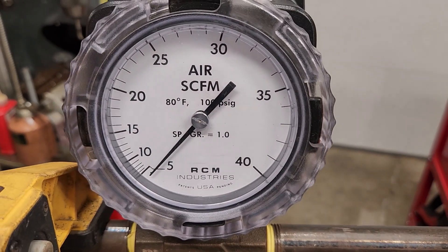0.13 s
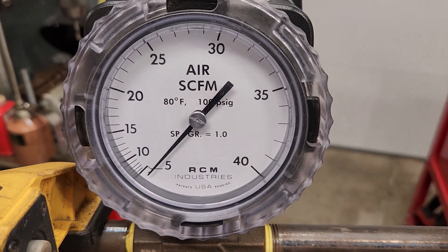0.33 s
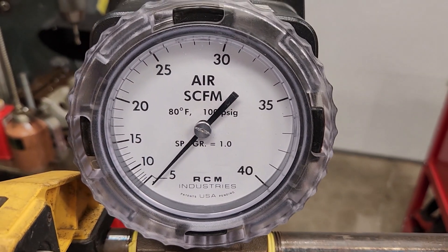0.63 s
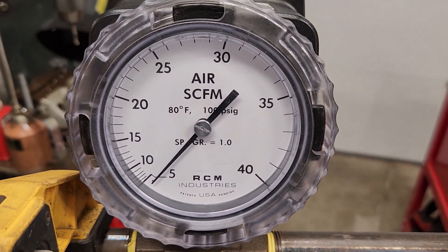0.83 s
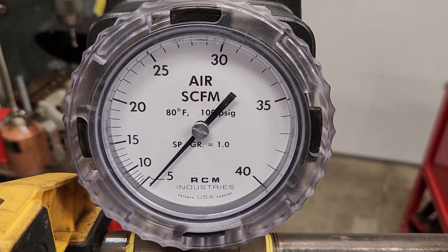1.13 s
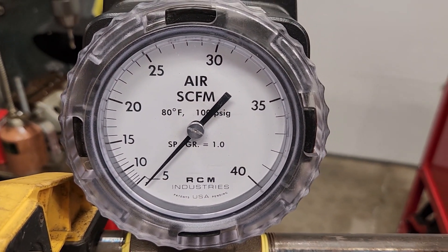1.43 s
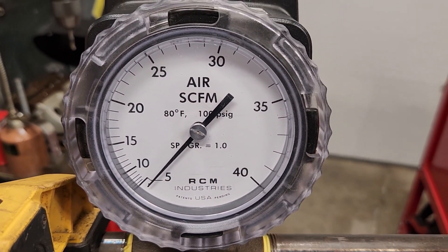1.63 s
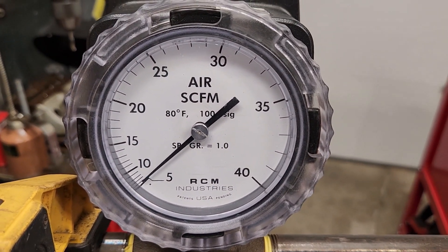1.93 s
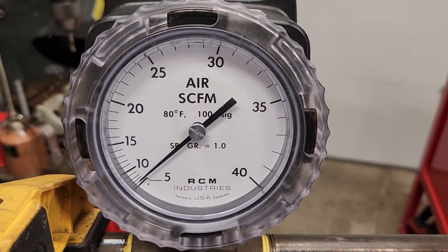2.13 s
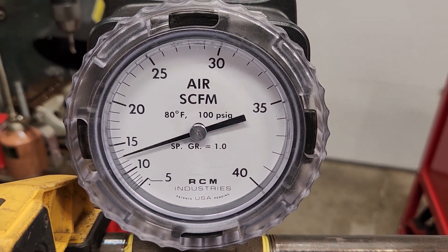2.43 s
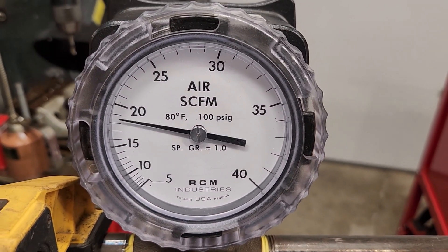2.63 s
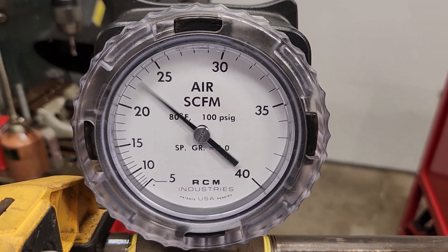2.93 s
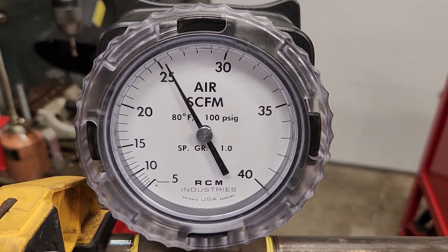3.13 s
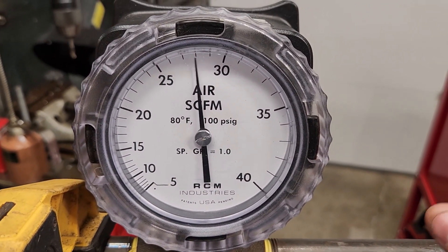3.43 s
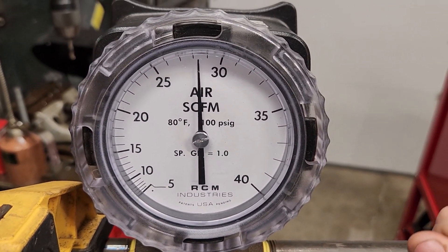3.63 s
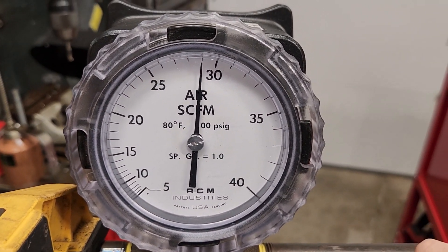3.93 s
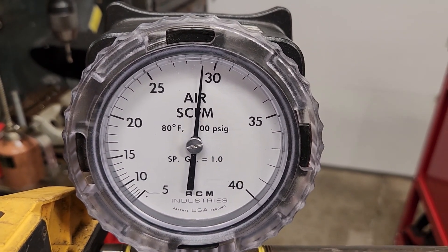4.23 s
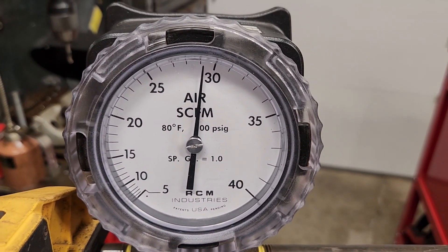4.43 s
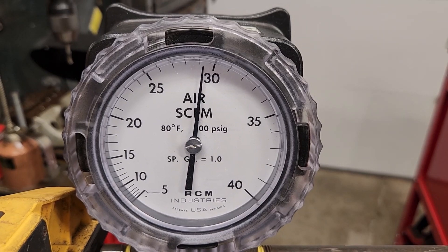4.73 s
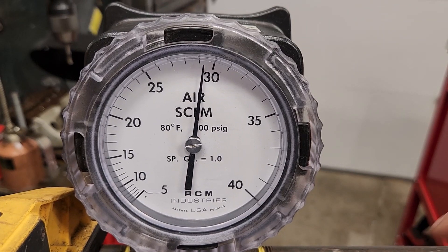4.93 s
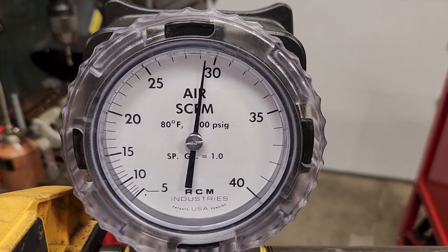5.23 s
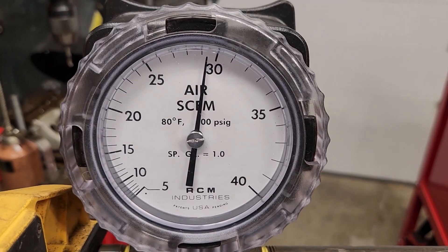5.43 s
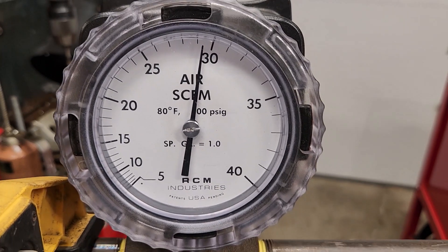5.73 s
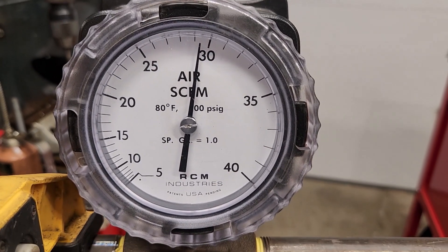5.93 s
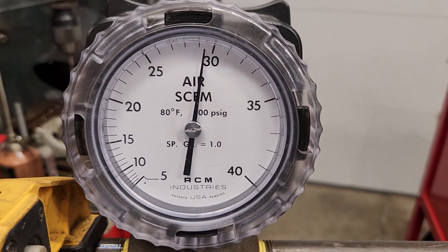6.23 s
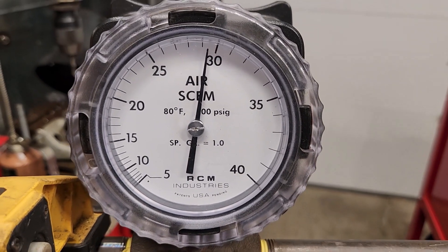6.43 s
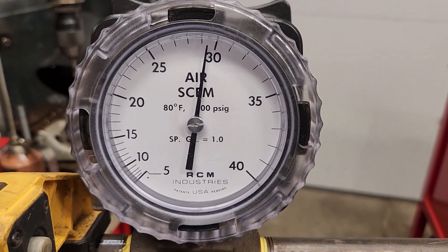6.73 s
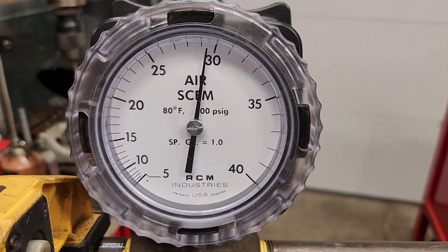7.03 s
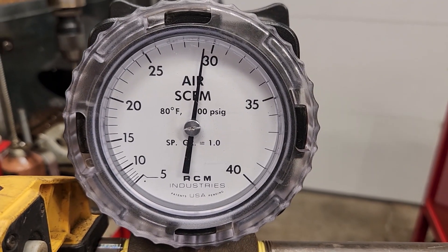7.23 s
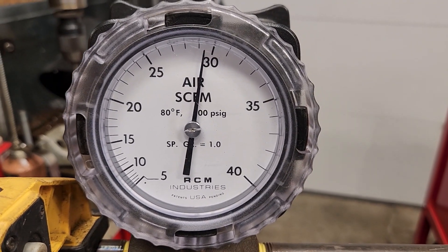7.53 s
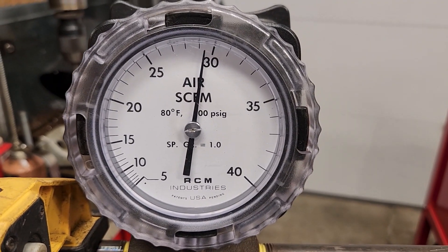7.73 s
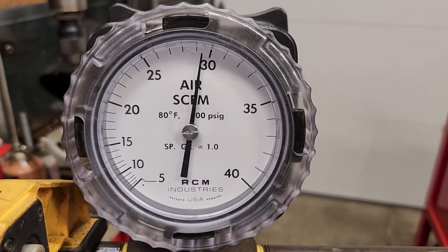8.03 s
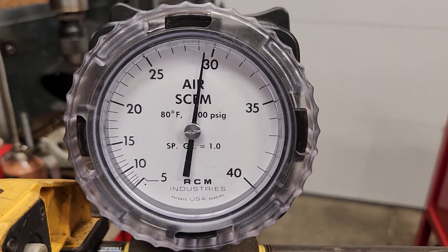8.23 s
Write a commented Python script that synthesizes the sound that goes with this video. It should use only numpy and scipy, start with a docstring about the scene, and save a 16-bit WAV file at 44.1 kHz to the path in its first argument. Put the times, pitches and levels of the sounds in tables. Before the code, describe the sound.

For the first 1.2 seconds there is only low ventilation rumble and machine hum in a workshop, with barely audible brushes of a hand near 0.1, 0.3 and 0.9 s. At about 1.25 s a valve unseats with tiny pops and a sudden bright, close hiss, overshooting then settling, with a narrow ring around 4 kHz. A second nudge at 1.8 s lifts it slightly. From 2.2 s low gusts flutter on the microphone, strongest near 2.6 s. Between 3.1 and 3.9 s the jet catches brief notes, sags in pitch and dies, as hose and coupler fill with a broad, ringing rush. From 4 s this strengthens into a steady, harsh, high-mid roar with airy spray, small irregular throbs and faint low puffs. A thin whistle near 11.5 kHz sits left, shifting rightward after about 5.5 s, when the tone sharpens slightly. The flow continues through the end at 8.3 s.

```python
"""Workshop: a valve on a compressed-air line is opened slowly, close to a two-port microphone.
The narrow gap first makes a bright jet of filtered noise, whose draught buffets the ports; it sinks and dies.
Then the full flow rings hose and coupler as noise bands, throbbing a little over a broad rush and spray.
A thin sine whistles from an edge; low ventilation rumble and hum lie behind, softer once the air is on."""
import sys
import numpy as np
from scipy import signal
from scipy.fft import rfft, irfft, next_fast_len
from scipy.io import wavfile
from scipy.ndimage import uniform_filter1d

SR = 44100
rng = np.random.default_rng(int(sys.argv[2]) if len(sys.argv) > 2 else 0)


def master_out(mix):
    """Clip the mix to full scale and print it as 16-bit PCM to the path in sys.argv[1]."""
    frames = np.transpose(np.atleast_2d(mix))
    ceiling = np.clip(frames, -1, 1)
    pcm = np.round(ceiling * 32767).astype(np.int16)
    wavfile.write(sys.argv[1], SR, pcm)


N = 369116
SIZE = next_fast_len(N + 4096, True)
HZ, TIME = np.fft.rfftfreq(SIZE, 1 / SR), np.arange(N) / SR
PORT_LAG_S = 0.000416  # the left port is further from the air line
PORT_PHASE = -2 * np.pi * HZ * PORT_LAG_S  # phase by which left leads (rad)

# the valve opens in nudges, each of which overshoots, then settles: (time [s], rise [s], lasting step [dB],
# overshoot of the roar [dB], overshoot of the fizz [dB], settling time [s])
NUDGES = [(1.24, 0.034, 28, 6, 2.5, 0.066), (1.81, 0.051, 2, 0.5, 2, 0.046)]


def valve_jet(walls):
    """The roar slides down as the jet slows; shock cells fizz only while the gap is narrow."""
    # mixing roar of the jet: (frequency [Hz], left [dB], right [dB]), relative
    roar_spectrum = [(60, -53, -19), (664, -15, -10.5), (1160, -7.5, -12), (1500, -0.5, -3.5),
                     (1950, -0.5, -6), (2894, -0.5, 0.5), (3800, 1.5, 4.5), (4180, -1, 0), (5720, -4.5, -4),
                     (6310, -10.5, -10), (7400, -16, -41), (11100, -10.5, -8.5), (16100, -36.5, -35)]
    # shock fizz of the jet: (frequency [Hz], left [dB], right [dB]), relative
    fizz_spectrum = [(3000, -31, -44), (5800, -3, -8), (7200, 1, -1.5), (8500, -1, -5), (10220, -0.5, -6),
                     (10900, -5, -17), (11900, 0, -6.5), (13700, -0.5, -3.5), (14620, 5, -8),
                     (15970, -0.5, -9)]
    # peaks and dips of the valve body: (frequency [Hz], width [Hz], left [dB], right [dB])
    valve_body = [(2130, 350, 5, 4), (2950, 130, 6.5, -1), (3820, 140, 0, 2), (4130, 240, 6, 7),
                  (4500, 240, 2.5, 5.5), (4820, 200, 6, 7), (5080, 120, -3, -1), (5380, 470, 8, 8),
                  (5880, 144, 5.5, -3), (5950, 120, 1.5, -10), (6850, 158, -6, -12.5), (6930, 277, 1, 5),
                  (9350, 550, -1, -12.5)]
    # slowing and sideways swing of the jet: (time [s], speed [factor on pitch], left minus right [dB])
    jet_path = [(1.3, 1.006, -1.5), (1.8, 0.98, -0.5), (2.5, 0.93, 0), (3.15, 0.95, 2), (3.33, 0.99, 2),
                (3.45, 0.74, 6.5), (3.6, 0.49, 7), (3.9, 0.23, -1)]
    gone_s = 3.89  # the valve is wide open

    roar_db, fizz_db = jet_levels()
    _, left_db = curves(jet_path)
    body = bumps(valve_body)

    # the roar's spectrum shrinks in frequency with the speed
    source = turbulence(body, PORT_PHASE, walls, loose_db=-1.0)
    hz, s, z = signal.stft(source, SR, nperseg=512)
    speed = np.interp(s, *np.transpose(jet_path)[:2])
    z = z * colour(roar_spectrum, hz[:, None] / speed) / np.sqrt(speed)
    roar = evened(signal.istft(z, SR, nperseg=512)[1][:, :N])
    roar = roar * amp(roar_db + np.outer([.5, -.5], left_db) - 0.17)

    fizz = turbulence(colour(fizz_spectrum) * body, PORT_PHASE, amp(3.0) * walls, loose_db=20.0)
    fizz = fizz * amp(fizz_db + 3.5)
    return (roar + fizz) * fade(1.243, 1.263) * fade(gone_s, 3.42) * amp(0.5 * wander(30))


def jet_levels():
    """Levels of roar and fizz in dB: each nudge of the valve lifts both, with an overshoot that dies away."""
    # the jet apart from the nudges: (time [s], roar [dB], shock fizz [dB]), before the trims in valve_jet
    levels = np.array(curves([(1.6, -19.5, -22.5), (2.03, -18.5, -22), (2.3, -19.5, -20.5),
                              (2.63, -21, -19.5), (3.04, -21.5, -22.5), (3.2, -22, -23.5),
                              (3.33, -22.5, -28.5), (3.56, -27.5, -50), (3.7, -25.5, -41.5)]))
    hold_s = 0.024  # an overshoot holds this long before it settles
    for s, rise, step_db, roar_db, fizz_db, settle in NUDGES:
        opened = fade(s, s + rise)
        overshoot = opened * np.exp(-np.maximum(TIME - s - rise - hold_s, 0) / settle)
        levels = levels + step_db * (opened - 1) + np.outer([roar_db, fizz_db], overshoot)
    return levels


def chamber(jet):
    """The colour of the valve's chamber takes over as the gap widens."""
    # peaks and dips of the chamber: (frequency [Hz], width [Hz], left [dB], right [dB])
    cavity = [(2050, 370, 3.5, 2.5), (2480, 310, -1, 3), (3420, 840, -3, -5), (4820, 130, 6, -6)]
    return jet + (filtered(jet, bumps(cavity)) - jet) * fade(2.85, 3.2)


def valve_pops():
    """As the valve unseats, each pop is a brief push of air and its rebound."""
    # pressure pops: (time [s], approximate peak [dB], time scale [s])
    pops = [(1.265, -32.5, 0.00034), (1.276, -28.5, 0.00061)]
    out = np.zeros(N)
    for s, db, length in pops:
        u = np.maximum(TIME - s, 0) / length
        out += amp(db) * 2 * u * (2 - u) * np.exp(-u)
    return out


def gap_ring(walls):
    """The first burst rings the narrow gap, which sings on more softly until the valve is nudged wider."""
    # ring of the barely open gap: (frequency [Hz], width [Hz], left [dB], right [dB], left's phase lead [rad]),
    # before the burst's level
    gap_mode = (4190, 140, -18.5, -16.5, 0.8)
    opens, rise = NUDGES[0][:2]
    settle_s = .06
    burst = np.exp(-np.maximum(TIME - opens - 0.07, 0) / settle_s)
    level_db = -7 * (1.5 - burst)  # sinks by 7 dB after the burst
    starts = fade(opens + rise / 2, opens + 2 * rise)
    ends = fade(1.9, NUDGES[1][0])
    return ring(gap_mode, walls) * amp(level_db) * starts * ends


def jet_notes(walls):
    """As the jet slows it catches one resonance of the valve after another, and the pitch finally sags."""
    # brief notes of the dying jet: (time [s], length [s], frequency [Hz], width [Hz], left [dB], right [dB],
    # left's phase lead [rad])
    notes = [(3.14, .14, 2170, 130, -31, -35, -0.53), (3.34, 0.12, 2825, 110, -26, -29, -.4),
             (3.57, 0.21, 2160, 160, -33, -37, -.6)]
    sag_from_s, sag_per_s = 3.45, .45  # share of the pitch lost each second
    pitch = np.clip(1 - sag_per_s * (TIME - sag_from_s), .5, 1)
    return sum(swell(s, length) * glide(ring(mode, walls), pitch) for s, length, *mode in notes)


def pipe_flow(walls):
    """The flow rings hose and coupler over a broad rush; the coupler throbs most, the hose follows gently."""
    # the hose fills and its modes settle: (time [s], drive [dB], pitch [factor])
    hose_drive = [(2.7, -9, 0.992), (3.05, -3, 0.85), (3.45, -3.5, 1.079), (3.7, -1, 0.96),
                  (4.0, -0.5, 0.9944), (4.6, 2, 1.0), (5.5, 3, 1), (8.3, 4, 0.99)]
    # modes of the hose: (frequency [Hz], width [Hz], left [dB], right [dB], left's phase lead [rad]), before drive
    hose_modes = [(356, 107, -45.5, -44, -0.2), (650, 220, -45, -43.5, -1), (1000, 217, -35, -37.5, -0.9),
                  (1894, 123, -31.5, -39, 3), (1990, 382, -32, -38, 2), (2732, 150, -33.5, -33, 1.7)]
    # modes of the coupler: (frequency [Hz], width [Hz], left [dB], right [dB], left's phase lead [rad],
    # step at the flip [dB]), before the flow's level
    coupler_modes = [(3495, 260, -34, -28.5, 4.5, -2), (4140, 300, -31.5, -26.5, 1, -5),
                     (4770, 130, -26, -27.5, 0.56, 1.5), (5520, 380, -23.5, -25, 4.5, -1),
                     (6371, 170, -26.5, -31.5, 2, 2.5), (6680, 200, -27, -30, 1.3, 4),
                     (7030, 240, -28.5, -26.5, 1.3, 2.5), (7290, 255, -29, -35, 1.7, 0),
                     (7724, 320, -29.5, -24, 0.94, 3), (8430, 230, -32, -37, -1.55, 1.5)]
    # rush in the line: (frequency [Hz], left [dB], right [dB]), relative
    rush_spectrum = [(60, -44, -34), (170, -19, -42), (306, -10, -10), (734, -14, -9), (1313, 0, -3.5),
                     (1630, -4, -4), (2510, 4.5, -5.5), (3180, 5.5, 7), (4300, 4, 4), (6000, 6.5, 4),
                     (7600, 1, -23), (9000, -14, -20), (16000, -35.5, -30)]
    # outlet spray: (frequency [Hz], left [dB], right [dB]), relative
    spray_spectrum = [(5002, -33, -34), (7948, 0, -3), (9330, 4, -5), (10350, 4, 2), (10930, 6.5, 6),
                      (11800, 6, 5), (11800, -0.5, -0.5), (13500, 5.5, 1), (14600, 3, -6),
                      (15200, 5.5, -11), (15900, -1.5, -10)]
    # peaks and dips of the line: (frequency [Hz], width [Hz], left [dB], right [dB])
    hollows = [(468, 29, -4, -14), (1210, 100, 3.5, -5), (1610, 61, 0, 2.5), (2475, 120, -10, 5.5),
               (3170, 200, -1.5, -2), (5040, 71, 3, 0), (6740, 100, -4.5, 3), (7200, 127, -7, 1),
               (8160, 140, -11, -8)]
    onset_s = 2.2  # air begins to rush in the line

    fill_db, throb_db = flow_strength()
    flow_db = fill_db + throb_db

    drive_db, pitch = curves(hose_drive)
    hose = glide(sum(ring(mode, walls) for mode in hose_modes), pitch)
    hose = hose * fade(2.86, 2.91) * amp(drive_db + 0.16 * throb_db)

    coupler = sum(ring(mode, walls) * amp(flow_db + step_db * flipped()) for *mode, step_db in coupler_modes)

    rush = turbulence(colour(rush_spectrum), PORT_PHASE, amp(-3.0) * walls, loose_db=-4)
    rush = rush * amp(-24.5 + 0.63 * flow_db)

    spray = turbulence(colour(spray_spectrum), PORT_PHASE, amp(2) * walls, loose_db=0.0)
    spray = spray * amp(-25 + 0.72 * flow_db - 7.2 * fade(3.88, 3.62))  # softer at first

    flutter = wander(31.0)  # the jet flaps at the outlet
    pipe = (hose + fade(onset_s, 4.26) * (coupler + rush)) * amp(0.39 * flutter)
    return filtered(pipe + fade(3.4, 3.46) * spray * amp(.5 * flutter), bumps(hollows))


def flow_strength():
    """The slow build-up of the flow towards full strength and its throbbing, both in dB."""
    # surges and falters of the flow: (time [s], length [s], change [dB])
    throbs = [(3.87, 0.17, 1.5), (4.074, 0.067, -0.5), (4.21, 0.033, -5), (4.248, 0.18, 1.5),
              (4.339, 0.035, -2), (4.538, 0.046, -3), (4.724, 0.095, -2), (4.804, 0.16, 1.5),
              (4.961, 0.12, -1.5), (5.155, 0.12, -1), (5.29, 0.084, 1), (5.365, 0.064, -2),
              (5.56, .18, -0.2), (5.69, .08, -2), (5.775, .08, 1), (5.87, .09, -2.5), (5.947, 0.053, -0.8),
              (6.023, 0.056, -2.2), (6.354, 0.062, 0.5), (6.553, 0.047, -3.5), (6.693, 0.11, -0.5),
              (6.786, 0.053, -3), (6.97, 0.24, -2), (7.154, 0.09, 2), (7.28, 0.2, -2), (7.417, 0.036, 1.5),
              (7.497, 0.031, 1.5), (7.758, 0.048, -1.5), (8.016, 0.14, 1.4), (8.17, 0.15, -3.5)]
    fill_start_s, fill_s = 3.35, 0.95  # start, time constant
    empty_db, filled_db = -8, 1.23
    fill_db = filled_db + (empty_db - filled_db) * np.exp(-np.maximum(TIME - fill_start_s, 0) / fill_s)
    throb_db = 0.72 * wander(10) + sum(db * swell(s, length) for s, length, db in throbs)
    return fill_db, throb_db


def flipped():
    """Goes from 0 to 1 as the flow in the coupler flips to a sharper state."""
    flip_at_s, flip_s = 5.4, 0.041
    return fade(flip_at_s, flip_at_s + flip_s)


def whistle():
    """Vortices shed from an edge in the coupler: a thin tone that wavers a little in pitch and strength."""
    # the whistle locks in on the left, then spreads to both ports: (time [s], left [dB], right [dB])
    whistle_levels = [(2.85, -48, -55), (3.15, -34, -44), (3.68, -31, -57), (3.8, -25, -47),
                      (4.15, -28.5, -50), (5.0, -23.5, -53), (5.5, -24.5, -37), (5.85, -31.5, -28),
                      (6.3, -32.5, -27.5), (8.3, -34, -27.5)]
    whistle_hz, flicker_db = 11463, 3.6
    phase = 2 * np.pi * np.cumsum(whistle_hz + 8 * wander(46)) / SR
    ports = []
    for side_db, lead in zip(curves(whistle_levels), [1.0, 0]):
        flickering = amp(side_db + flicker_db * wander(12))  # each port flickers by itself
        ports.append(flickering * np.sin(phase + lead))
    return np.sqrt(2) * np.array(ports) * fade(2.8, 2.9)


def draught():
    """Eddies hit the ports in lumps, the left one harder; small, brighter eddies grow with a strong draught."""
    # spectrum of the buffeting: (frequency [Hz], density [dB per Hz]), relative
    buffet = colour([(12, -35), (20, -14), (70, 4), (130, -2.5), (243, -4.5), (358, -4.5), (430, -8),
                     (688, -5), (1100, -12), (1430, -18.5), (2420, -120)])
    level_db = draught_level()
    large = turbulence(buffet / (1 + (HZ / 150) ** 2), phase=0, walls=0, loose_db=-9.5)
    large = large * amp(2.2 * wander(13) - 7.5)
    small = turbulence(buffet * HZ / (HZ + 150), phase=0, walls=0, loose_db=2)
    small = small * amp(0.21 * (level_db + 35.0) - 0.14 + 0.49 * wander(26))
    return (large + small) * amp(level_db + np.array([[2.5], [-2.5]])) * fade(1.255, 1.275)


def draught_level():
    """Level in dB of the jet's passing sweep, the single gusts and a light draught that comes and goes."""
    # single gusts on the microphone: (time [s], length [s], level [dB]), before the split between the ports
    gust_list = [(1.283, 0.04, -50), (1.41, 0.098, -51), (1.59, 0.3, -58), (1.915, 0.061, -47),
                 (2.216, 0.08, -38.5), (2.426, 0.073, -42), (2.635, 0.049, -39), (2.797, 0.089, -43),
                 (3, 0.036, -43), (4.821, 0.05, -57), (5.28, 0.053, -53), (5.494, 0.074, -46),
                 (5.703, 0.043, -45), (5.906, 0.079, -45), (6.118, 0.057, -42), (6.3, .06, -49),
                 (6.58, .04, -54), (6.684, 0.053, -48), (7.138, 0.042, -51), (7.407, .05, -50),
                 (7.64, 0.052, -50), (7.803, 0.072, -48)]
    sweep_at_s, sweep_db = 2.624, -26.5  # peak of the sweep over the microphone
    rise, fall = 20.3, 31  # dB per s
    calm_db, stirred_db, lumps_db = -50.5, -47.5, 3  # light draught before and after the flip, its swing

    sweep = amp(sweep_db - np.maximum(rise * (sweep_at_s - TIME), fall * (TIME - sweep_at_s)))
    gusts = sum(amp(db) * swell(s, length) for s, length, db in gust_list)
    lumps = lumps_db * np.tanh(2 * wander(8.8))
    light = amp(calm_db + (stirred_db - calm_db) * flipped() + lumps)
    return 20 * np.log10(sweep + gusts + light)


def hollowed(air):
    """Valleys slide down and deepen in patches; the right port's middle is shaded and the bass has lulls."""
    # valleys between the modes: (frequency [Hz], width [Hz], depth before the patches [dB], opens at [s],
    # opening time [s])
    valleys = [(593, 256, -5, 1.28, 0.033), (1430, 255, -12.5, 4, 1.1), (2550, 134, -10, 3.4, 0.25),
               (3285, 290, -9.5, 3.4, 0.11), (5010, 77, -5, 3.6, 2.0)]
    # middle range of the right port: (time [s], level [dB])
    shade = [(3.4, -3), (3.9, -8), (4.9, -8), (5.3, -5), (5.55, 1.5)]
    # brief losses of bass: (time [s], length [s], depth [dB])
    lulls = [(1.35, 0.057, 10), (1.68, 0.045, 13), (2.967, .06, 3), (3.328, 0.072, 9), (3.436, 0.045, 13),
             (3.58, 0.066, 17), (3.826, .04, 11), (4.353, 0.072, 19), (4.58, 0.07, 19), (4.7, 0.078, 15),
             (5.011, 0.085, 22), (5.177, 0.055, 12), (5.412, 0.068, 27), (5.76, 0.037, 10),
             (6.03, 0.055, 21), (6.183, .045, 20), (6.505, .07, 21), (7.22, .05, 13), (7.32, 0.05, 10),
             (7.52, 0.077, 8), (8.03, 0.059, 16)]
    patch_hz, patch_s, uneven = 95, .045, 2  # size of the patches, spread of their depth
    slide_from_s, sharp, settle_s = 3.6, 0.09, 0.31  # until then the valleys lie higher by this share
    shade_hz, shade_width_hz, lull_below_hz = 2254, 1300, 170

    hz, s, z = signal.stft(air, SR, nperseg=1024, noverlap=768)
    patch_rows, patch_columns = round(max(patch_hz / hz[1], 1)), round(max(patch_s / s[1], 1))
    patches = uniform_filter1d(rng.standard_normal(z.shape[1:]), patch_rows, axis=0)
    patches = uniform_filter1d(patches, patch_columns, axis=1)
    depth = np.maximum(1 + uneven * patches / patches.std(), 0) ** 2 / 2

    pitch = 1 + sharp * np.exp(-np.maximum(s - slide_from_s, 0) / settle_s)
    hz = hz[:, None]
    valleys_db = 0
    for centre, width, db, opens, takes in valleys:
        opened = np.clip((s - opens) / takes, 0, 1)
        valleys_db = valleys_db + db * opened * np.exp(-2 * ((hz / pitch - centre) / width) ** 2)

    lulls_db = np.interp(s, TIME, sum(db * swell(at, length) for at, length, db in lulls))
    lulls_db = lulls_db / (1 + (hz / lull_below_hz) ** 4)
    shade_db = np.interp(s, *np.transpose(shade)) * np.exp(-2 * ((hz - shade_hz) / shade_width_hz) ** 2)
    z = z * amp(depth * valleys_db - lulls_db) * amp([np.zeros_like(shade_db), shade_db])
    return signal.istft(z, SR, nperseg=1024, noverlap=768)[1][:, :N]


def rustles():
    """Soft brushes of a hand on the gear before the valve opens: swells of band-shaped noise."""
    # faint rustles of handling: (time [s], length [s], level [dB], centre [Hz], width [Hz])
    brushes = [(.09, .08, -84, 7500, 900), (.1, .14, -80, 1900, 900), (.305, .06, -81.5, 2200, 1100),
               (.93, .07, -84, 1900, 1200)]
    out = 0
    for s, length, db, hz, width in brushes:
        band = np.exp(-2 * ((HZ - hz) / width) ** 2)
        out = out + amp(db) * swell(s, length) * turbulence(band, phase=0, walls=0, loose_db=2.0)
    return out


def workshop():
    """Low ventilation rumble, mostly alike at both ports, swells and sinks over a wavering machine hum."""
    # ventilation in the workshop air: (frequency [Hz], density [dB per Hz]), relative
    ventilation = [(20, -10), (45, -2), (70, -2), (130, -4.5), (300, -14), (430, -24), (600, -22),
                   (850, -28), (1150, -36), (2200, -40), (3500, -48), (7500, -50), (10000, -64),
                   (15000, -60)]
    # partials of the machine hum: (frequency [Hz], level [dB]), before a 1 dB cut and the wavering
    partials = [(59.6, -57), (339, -70), (501, -79), (548, -81), (625, -86), (764, -81), (791, -86),
                (1066, -92)]
    rumble = turbulence(colour(ventilation) * amp([[.6], [-.6]]), phase=0, walls=0, loose_db=-6.0)
    rumble = evened(rumble * amp(1.1 * wander(8.1)))
    hum = 0
    for hz, db in partials:
        level = amp(db - 1.0 + 3.3 * wander(6.7))
        phase = 2 * np.pi * np.cumsum(hz * (1 + .016 * wander(12))) / SR
        hum = hum + level * np.sqrt(2) * np.sin(phase)
    return amp(-57) * rumble + hum


def room(t60):
    """Response of the workshop's reflections at each port: decaying noise of energy 1."""
    t = np.arange(SR // 2) / SR
    tail = rng.standard_normal((2, len(t))) * amp(-60 * t / t60)
    return rfft(tail / np.linalg.norm(tail, axis=1, keepdims=True), SIZE)


def turbulence(gain, phase, walls, loose_db):
    """Noise heard directly, left leading by the phase, off the walls, and from loose eddies at each port."""
    lead = np.exp(.5j * np.atleast_1d(phase))
    heard = noise() * (np.array([lead, lead.conj()]) + walls)
    heard = heard + amp(loose_db) * noise(channels=2)
    return evened(irfft(heard * gain, SIZE)[:, :N])


def ring(mode, walls):
    """Turbulence rings one mode: a narrow band of noise at its own level in each port."""
    hz, width, left_db, right_db, phase = mode
    resonance = 1 / (1 + ((HZ - hz) / (0.67 * width)) ** 2)
    band = turbulence(resonance, phase, amp(-5.5) * walls, loose_db=-6.5)
    return band / band.std(1, keepdims=True) * amp([[left_db], [right_db]])


def noise(channels=1):
    """Spectrum of white noise: one source, or one for each port."""
    return rng.standard_normal((channels, 2 * len(HZ))).view(complex)


def wander(hz):
    """Slow chance of rms 1, up to about the given rate."""
    s = TIME[::64]
    smoothing = 1 + (np.fft.rfftfreq(len(s), s[1]) / hz) ** 2
    slow = irfft(rfft(rng.standard_normal(len(s))) / smoothing, len(s))
    return np.interp(TIME, s, slow / slow.std())


def glide(x, pitch):
    """Moves all frequencies of a sound by a factor that changes in time, by varying the reading speed."""
    place = np.cumsum(pitch) % N
    return np.array([np.interp(place, np.arange(N), side) for side in x])


def filtered(x, gain):
    """A sound through a fixed frequency response."""
    return irfft(rfft(x, SIZE) * gain, SIZE)[:, :N]


def colour(table, hz=HZ):
    """Gain of each column of a spectrum table, joined on a log-frequency axis."""
    f, *columns = np.transpose(table)
    return amp([np.interp(np.log(hz + 1), np.log(f + 1), c) for c in columns])


def bumps(table):
    """Left and right gain of a set of bell-shaped peaks and dips."""
    gain_db = 0
    for hz, width, left, right in table:
        gain_db = gain_db + np.outer([left, right], np.exp(-2 * ((HZ - hz) / width) ** 2))
    return amp(gain_db)


def curves(rows):
    """Each column of a curve table at every sample."""
    s, *columns = np.transpose(rows)
    return [np.interp(TIME, s, c) for c in columns]


def fade(start, end):
    """Goes from 0 at start to 1 at end; with the end earlier than the start it fades out."""
    return np.clip((TIME - start) / (end - start), 0, 1)


def swell(s, length):
    """A smooth bump of height 1 around a moment."""
    return np.exp(-np.pi * ((TIME - s) / length) ** 2)


def amp(db):
    """Decibels to gain."""
    return 10 ** (np.asarray(db) / 20)


def evened(x):
    """Scales a sound so that the mean of its channels has rms 1."""
    return x / (np.atleast_2d(x).mean(0).std() + 1e-20)


def scene():
    """The air line in its room, whose rumble and hum sink by 22 dB as the air comes on."""
    walls = room(t60=0.095)
    air = valve_pops() + gap_ring(walls) + jet_notes(walls) + chamber(valve_jet(walls))
    air = air + pipe_flow(walls) + whistle() + draught()
    return hollowed(air) + rustles() + workshop() * amp(-22 * fade(1.26, 1.35))


def record(dry):
    """The colour of the microphone ports, then the band limit."""
    # dips in the response of the ports: (frequency [Hz], width [Hz], left [dB], right [dB])
    port_dips = [(7990, 262, -12, -4.5), (9320, 810, -3.5, -19), (10717, 250, -1.5, -10),
                 (11160, 370, -2, -8)]
    edge_hz = 15800
    heard = filtered(dry, bumps(port_dips))
    low_pass = signal.firwin(1023, edge_hz, window=("kaiser", 8), fs=SR)
    return signal.oaconvolve(heard, low_pass[None], "same")


dry = scene()
out = record(dry)
master_out(out)
```